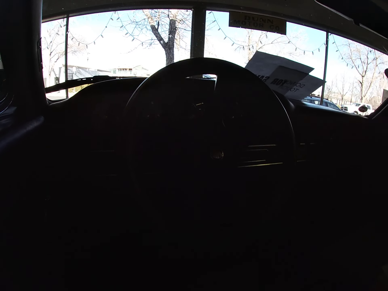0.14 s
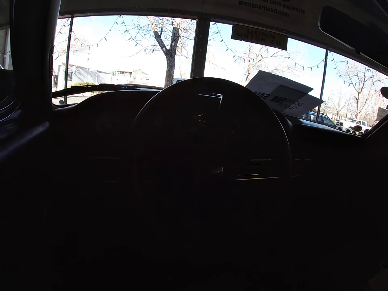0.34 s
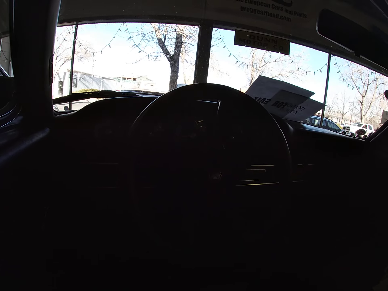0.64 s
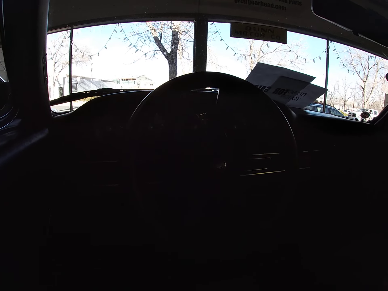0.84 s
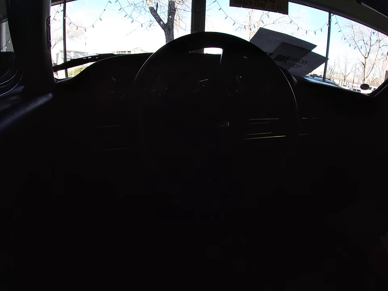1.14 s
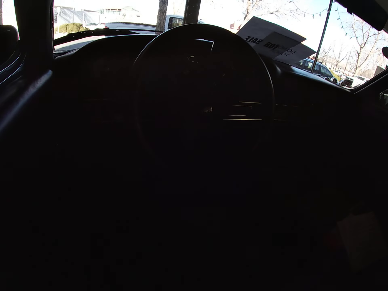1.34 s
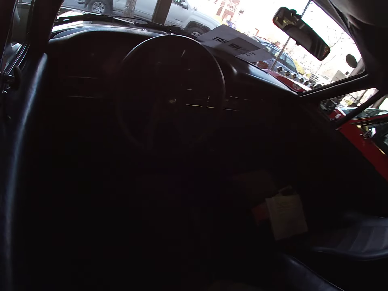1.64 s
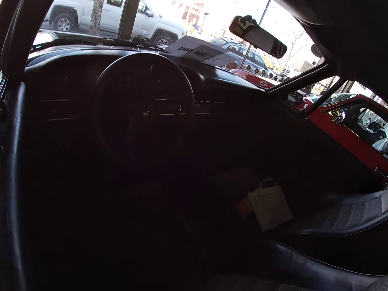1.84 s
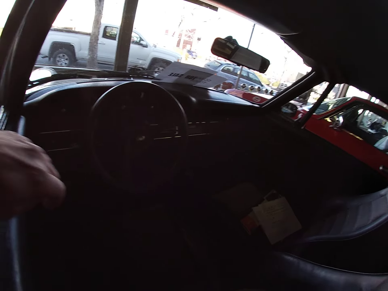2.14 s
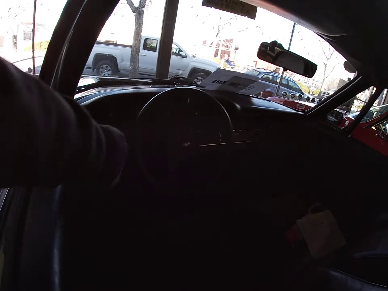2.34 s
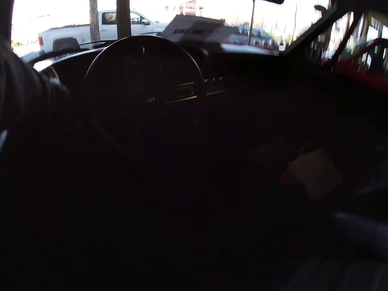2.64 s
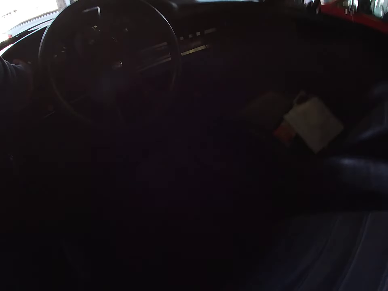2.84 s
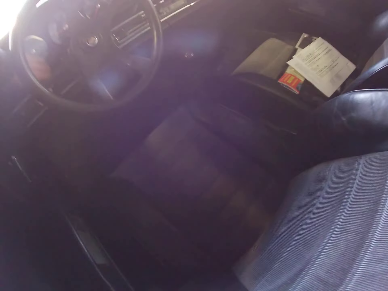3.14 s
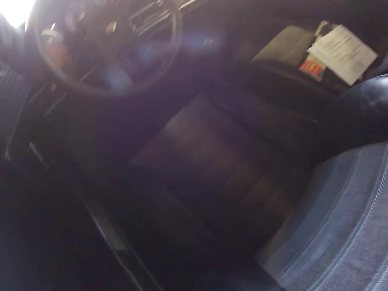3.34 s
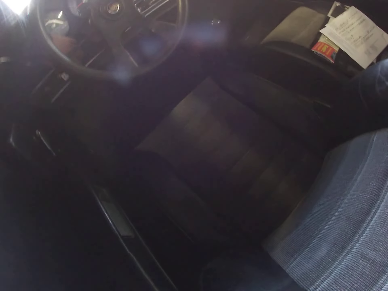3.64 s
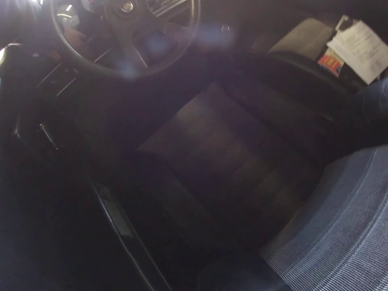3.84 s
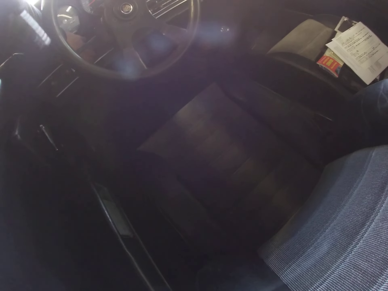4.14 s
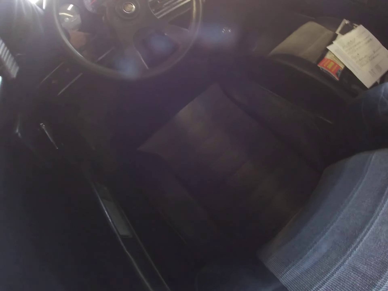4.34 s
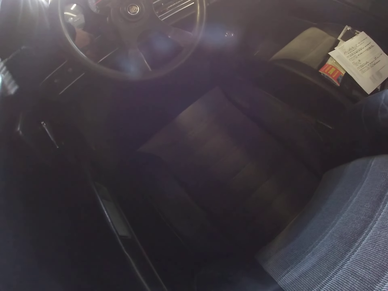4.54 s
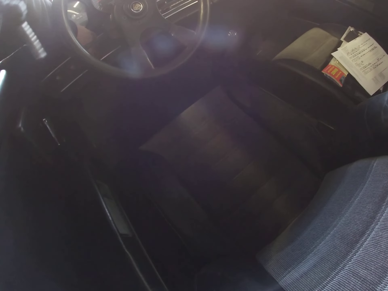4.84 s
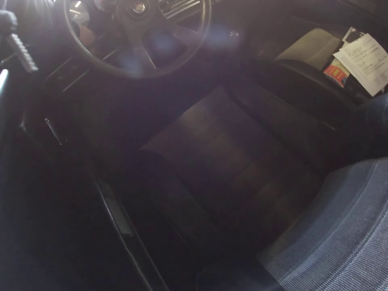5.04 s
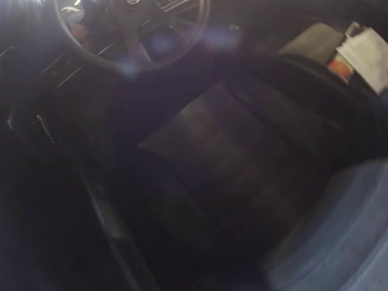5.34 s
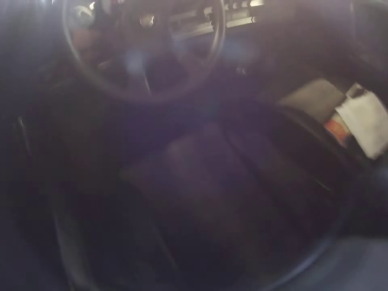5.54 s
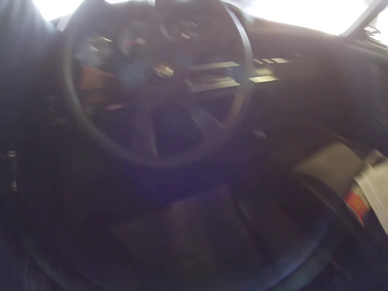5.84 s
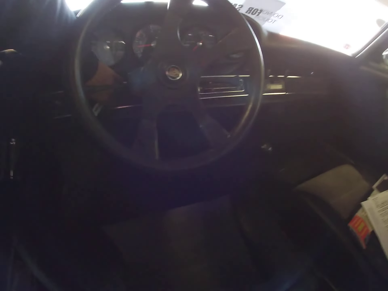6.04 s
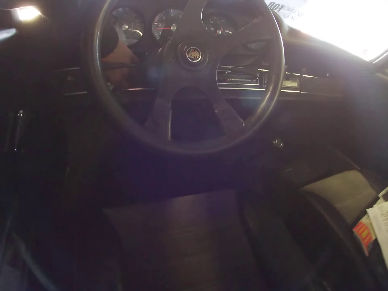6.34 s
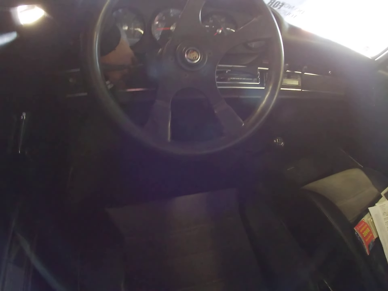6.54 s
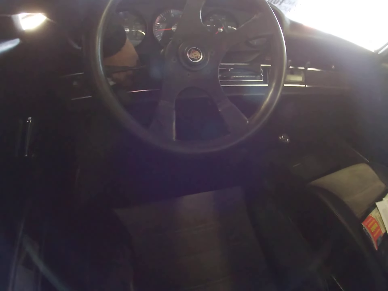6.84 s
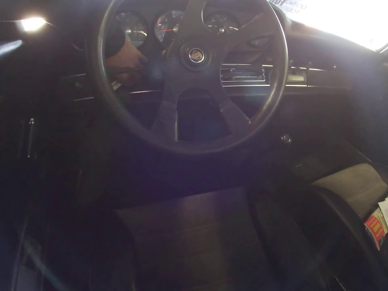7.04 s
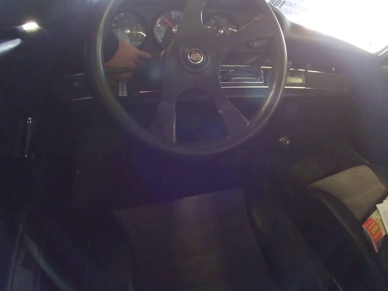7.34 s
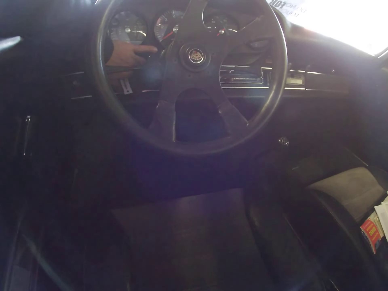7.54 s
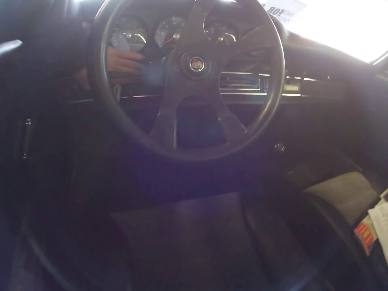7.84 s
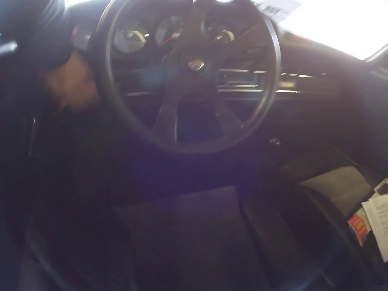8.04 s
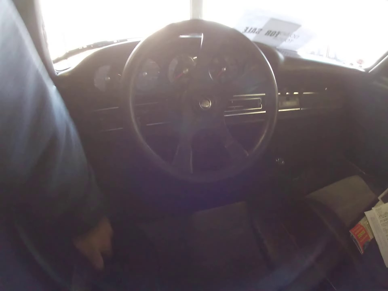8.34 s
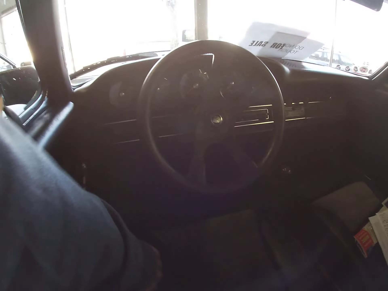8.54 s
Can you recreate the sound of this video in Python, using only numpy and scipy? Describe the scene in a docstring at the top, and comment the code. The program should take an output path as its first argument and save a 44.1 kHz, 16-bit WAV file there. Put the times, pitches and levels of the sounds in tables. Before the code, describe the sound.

A rough, slightly wavering idle fills a car cabin, its deep boom swelling and dipping as the close microphone is moved and jogged. Clatter and whine come forward toward the door and recede again. After about seven seconds a key clacks, the engine loses its bite, lurches down and stops. Then come crisp metal lock clicks, cloth rustle and dull seat knocks, with faint deep street noise.

```python
"""An air-cooled six-cylinder engine idles behind a car cabin, heard from a microphone moving about inside.
Crank-locked lines boom over noise puffs; valve knocks gate noise; gears and fan whine as higher lines.
The key is turned and the engine runs down: compression strokes and shudders ring damped modes of the body.
Keys and lock are noise cracks with short rings, sleeves and seat scrapes are grainy noise swishes,
the driver's seat bumps and the jogged microphone are damped thuds; a quiet street is steady coloured noise."""
import sys
import numpy as np
from scipy import signal
from scipy.fft import rfft, irfft, next_fast_len
from scipy.io import wavfile
from scipy.ndimage import uniform_filter1d

SR = 44100
rng = np.random.default_rng(int(sys.argv[2]) if len(sys.argv) > 2 else 0)


def int16_out(signal):
    """Quantize to a 16-bit WAV file."""
    q = np.round(np.clip(np.atleast_2d(signal).T, -1, 1) * 32767)
    wavfile.write(sys.argv[1], SR, q.astype(np.int16))


N = 383669

# air resonance of the cabin, which the 6th exhaust harmonic can meet
CABIN_HZ, CABIN_WIDTH_HZ = 220.44, 19.6


def undb(db):
    """Decibels to gain."""
    return 10 ** (np.asarray(db) / 20)


def unit(x):
    """Scale to an rms of one."""
    return x / np.sqrt(np.mean(x ** 2))


def curves(rows):
    """Each column of a (t/s, ...) table at every sample."""
    s, *columns = np.transpose(rows)
    t = np.arange(N) / SR
    return [np.interp(t, s, column) for column in columns]


def colour(x, points):
    """Causal minimum-phase filter through (f/Hz, level/dB) points."""
    size = next_fast_len(2 * len(x))
    size += size % 2
    hz, db = np.transpose(points)
    bin_hz = np.arange(size // 2 + 1) * SR / size
    gain_db = np.interp(np.log(bin_hz + 1), np.log(hz), db)
    # folding the cepstrum onto positive time makes the response causal
    cepstrum = irfft(np.log(undb(gain_db)))
    cepstrum[1:size // 2] *= 2
    cepstrum[size // 2 + 1:] = 0
    return irfft(rfft(x, size) * np.exp(rfft(cepstrum)))[:len(x)]


def walk(rate):
    """Smooth random drift with an rms of one, from `rate` fresh values a second."""
    k = int(SR / rate)
    held = np.repeat(rng.standard_normal(N // k + 2), k)[rng.integers(k):][:N]
    return unit(uniform_filter1d(held, k))


def fade(t, t60):
    """Exponential decay, 60 dB down after t60."""
    return np.exp(-np.log(1000) * t / t60)


def add(out, s, sound):
    """Mix a sound in from time s."""
    start = int(s * SR)
    out[start:start + len(sound)] += sound[:N - start]


def resonance(hz, centre_hz, width_hz):
    """Gain of a resonance for a line at hz, one at its centre."""
    return 1 / np.hypot(1, 2 * (hz - centre_hz) / width_hz)


def tone(firings, order, waver_db, slip, rate, late=None):
    """Crank-locked line, uneven in level and phase (slip, radians); it crests `late` radians on, or anywhere."""
    late = 2 * np.pi * rng.random() if late is None else late
    phase = 2 * np.pi * order * firings - late + slip * walk(rate)
    return np.sqrt(2) * undb(waver_db * walk(rate)) * np.cos(phase)


def strikes(events, modes, points, t60, ring_db, settle):
    """Small metal parts: a crack scattered round the cabin and a short ring; each event tilts the treble."""
    ring_scatter = .004
    out, t = np.zeros(N), np.arange(SR // 4) / SR
    for s, db, bright_db in events:
        tilted = [(hz, g + bright_db * np.log2(hz)) for hz, g in points]
        envelope = fade(t, t60) + np.exp(-t / settle) + .05 * fade(t, 0.15)
        crack = colour(rng.standard_normal(len(t)) * envelope, tilted)
        ring = 0
        for hz, g, life in modes:
            cycles = hz * rng.normal(1, ring_scatter) * t + rng.random()
            ring = ring + undb(g + bright_db * np.log2(hz)) * fade(t, life) * np.sin(2 * np.pi * cycles)
        hit = unit(crack) + undb(ring_db) * unit(ring)
        # the event level is that of its first 5 ms
        add(out, s, undb(db) * hit / np.std(hit[:SR // 200]))
    return out


def thuds(events, scuff=.5, attack_s=0.0036):
    """Padded blows: a damped thud with a little scuff."""
    out, t = np.zeros(N), np.arange(SR // 3) / SR
    for s, db, hz, t60 in events:
        dull = [(hz / 3, -20), (hz, 0), (2 * hz, -9), (8 * hz, -40), (30 * hz, -80)]
        noise = unit(colour(rng.standard_normal(len(t)), dull))
        envelope = fade(t, t60) * (1 - np.exp(-t / attack_s))
        add(out, s, undb(db) * (np.sin(2 * np.pi * hz * t) + scuff * noise) * envelope)
    return out


def exhaust(firings, hz, even_db, weak_db, shake_db):
    """Strong even firing harmonics, weaker crank-locked lines, and unequal puffs rumbling through the body."""
    # weaker crank-locked lines of exhaust, belt and gears: multiple of the firing rate, level/dB
    weak_orders = [(.667, -37.5), (.885, -33), (1, -29), (3, -39.5), (5, -41), (7, -52.5), (8, -52.5),
                   (13, -62.5), (15, -54.5)]
    # rumble through the body shell: f/Hz, level/dB
    rumble_colour = [(15, -19), (30, 10), (55, 4), (80, -2.5), (120, 7), (170, -5.5), (250, -13),
                     (350, -23), (500, -20), (900, -76.5)]
    lump_db = .9  # one firing is stronger than the next
    puff_s = 0.02  # decay of one puff; the puffs draw apart as the crank slows
    second, fourth, sixth = (undb(db) for db in even_db)
    # the strong lines crest together at each puff; the cabin resonance holds the sixth back
    cabin_lag = np.pi / 2 + np.arctan(2 * (6 * hz - CABIN_HZ) / CABIN_WIDTH_HZ)
    boom = (second * tone(firings, 2, waver_db=0.64, slip=0.06, rate=20, late=0)
            + fourth * tone(firings, 4, waver_db=1.74, slip=0.17, rate=10, late=0)
            + sixth * tone(firings, 6, waver_db=1.0, slip=0.092, rate=14, late=cabin_lag))
    boom = boom * undb(lump_db * walk(np.median(hz)))
    weak = sum(undb(db) * tone(firings, order, waver_db=3.0, slip=0.73, rate=9)
               for order, db in weak_orders)
    puffs = rng.standard_normal(N) * np.exp(-(firings % 1) / hz / puff_s)
    rumble = undb(-32.5) * unit(colour(puffs, rumble_colour))
    return boom + undb(weak_db) * (weak + crank_lines(firings, hz)) + undb(shake_db) * rumble


def crank_lines(firings, hz, count=52):
    """Unequal cylinders repeat with each turn of the crank, every three firings, giving faint lines."""
    # level of each line by its pitch: f/Hz, level/dB
    line_levels = [(45, -41), (95, -47.5), (150, -56.5), (250, -61.5), (380, -58.5), (470, -69), (540, -63),
                   (700, -69)]
    line_hz, line_db = np.transpose(line_levels)
    orders = [k / 3 for k in range(4, count) if k % 3]
    lines = 0
    for order in orders:
        gain = undb(np.interp(order * np.median(hz), line_hz, line_db))
        lines = lines + gain * tone(firings, order, waver_db=2.5, slip=0.67, rate=5)
    return lines


def valve_train(firings, door_db, scatter_db=3.0, air=1.0):
    """Two valve knocks a firing over the rush of cooling air, both as shaped noise."""
    # valve knock of each cylinder in firing order: level/dB
    cylinders = [-1.5, -9.5, -5, -4, -9, -6.5]
    # clatter through the upholstery: f/Hz, level/dB
    clatter_colour = [(200, -24.5), (300, -7), (400, -7.5), (480, -10.5), (600, -10), (780, -9), (1100, -7),
                      (1450, -10), (2300, -18.5), (4200, -24.5), (5500, -31.5), (8000, -33), (9500, -49),
                      (12000, -75.5)]
    # treble through the open door, with ringing peaks of the engine casing: f/Hz, level/dB
    door_colour = [(750, -17.5), (950, -4.5), (1040, 9), (1200, 2.5), (1340, 10), (1500, 8), (1680, 8),
                   (2300, 5), (3200, 1.5), (5000, -3), (8000, -7), (10000, -25), (14000, -43.5)]
    knock_decay = .3  # in knock intervals
    door_sharpness = 1.1  # the knocks stand out more sharply through the open door
    knock = (2 * firings).astype(int)
    size_db = np.take(cylinders, knock // 2, mode="wrap") + scatter_db * rng.standard_normal(N)[knock]
    knocks = undb(size_db) * np.exp(-(2 * firings % 1) / knock_decay)
    rush = air * undb(0.3 * walk(16))
    grit = np.hypot(knocks, rush)
    muffled = unit(colour(grit * rng.standard_normal(N), clatter_colour))
    # near the open door the treble arrives without passing through the upholstery
    direct = unit(colour(grit ** door_sharpness * rng.standard_normal(N), door_colour))
    return undb(2.0) * muffled + undb(door_db) * direct


def whine(firings, hz, fan_db, hum_db, panel_hz=336, panel_width_hz=26):
    """Rough gear and fan lines; the lowest pair sings out when the idle meets a panel resonance."""
    # timing gears: multiple of the firing rate, level/dB
    gear_orders = [(24.2, -60.5), (28, -53.5), (30.2, -59), (31.7, -57), (37.333, -55), (46.3, -62)]
    # cooling fan and its belt drive: multiple of the firing rate, level/dB
    fan_orders = [(18.667, -50.5), (19.6, -53)]
    # hum of the panel: multiple of the firing rate, level on resonance/dB
    hum_orders = [(9.333, -52), (9.7, -49.5)]
    # the highest gear line comes and goes as the microphone moves: t/s, level/dB
    high_whine = [(0, -58), (.35, -63), (.9, -59.5), (1.3, -57), (1.5, -62), (1.68, -47.5), (1.9, -56),
                  (2.18, -51), (2.6, -57), (3.2, -65), (3.38, -55), (3.7, -59), (3.9, -64), (4.3, -64),
                  (4.5, -58.5), (5.0, -58.5), (5.25, -65), (5.6, -62), (6.3, -64.5), (7.3, -65)]
    gear_slip, fan_slip = .82, .95  # radians: backlash makes teeth meet early or late, smearing the lines
    swell_db = 0.8  # each lower gear line comes and goes on its own
    chatter_db = 1.5  # the teeth rattle, which breaks the whine up
    gears = sum(undb(db + swell_db * walk(5)) * tone(firings, order, waver_db=2.5, slip=gear_slip, rate=30)
                for order, db in gear_orders)
    high_db, = curves(high_whine)
    high = undb(high_db) * tone(firings, 56, waver_db=2.5, slip=gear_slip, rate=24)
    fan = sum(undb(db) * tone(firings, order, waver_db=2.5, slip=fan_slip, rate=28)
              for order, db in fan_orders)
    hum = 0
    for order, db in hum_orders:
        line = undb(db) * tone(firings, order, waver_db=2.5, slip=0.56, rate=16)
        hum = hum + line * resonance(order * hz, panel_hz, panel_width_hz)
    chatter = unit(undb(chatter_db * walk(90)))
    return chatter * gears, chatter * (high + undb(fan_db) * fan) + undb(hum_db) * hum


def engine():
    """The crank speed sets every line's pitch; the layers sink as the engine runs down after the key turns."""
    # the idle hunts slowly up and down: t/s, firing rate f/Hz
    idle = [(0.0, 35.56), (0.13, 35.8), (0.24, 35.3), (0.54, 34.54), (0.78, 35.37), (0.92, 36.05),
            (1.31, 36.21), (1.48, 34.97), (1.55, 34.89), (1.96, 35.47), (2.12, 36.8), (2.3, 37.01),
            (2.38, 36.65), (2.53, 35.24), (2.73, 34.34), (2.94, 34.97), (3.08, 36.35), (3.15, 36.76),
            (3.43, 36.11), (3.66, 35.94), (3.85, 34.78), (4.12, 35.31), (4.3, 36.53), (4.75, 36.19),
            (4.88, 35.76), (5.47, 36.77), (5.92, 35.94), (6.28, 37.07), (6.43, 36.4), (6.57, 35.16),
            (6.71, 35.15), (7.06, 36.74), (7.2, 38.14), (7.27, 37.91)]
    # boom at twice the firing rate, as the microphone moves and the engine runs down: t/s, level/dB
    second_level = [(0.0, -22.5), (0.12, -38), (0.3, -22), (0.45, -16.5), (0.72, -22.5), (0.92, -34),
                    (1.02, -23.5), (1.32, -20), (1.5, -28.5), (1.68, -23.5), (1.87, -20.5), (1.93, -22),
                    (2.0, -18.5), (2.55, -19.5), (2.68, -27.5), (2.97, -30.5), (3.11, -21.5), (3.35, -27),
                    (3.85, -23.5), (4.35, -22), (4.8, -24.5), (5.3, -22), (5.7, -28), (5.98, -33),
                    (6.24, -19), (6.46, -33.5), (6.73, -17.5), (6.86, -22), (6.95, -32.5), (7.07, -20),
                    (7.28, -24.5), (7.42, -22.5), (7.56, -22.5), (7.66, -27), (7.75, -24.5), (7.87, -25.5),
                    (7.96, -28.5), (8.09, -24), (8.19, -33)]
    # line at four times the firing rate: t/s, level/dB
    fourth_level = [(0, -35.5), (.45, -26.5), (.7, -32.5), (1.25, -26.5), (1.45, -33), (1.85, -30.5),
                    (1.99, -37), (2.08, -29.5), (2.22, -28), (2.48, -32.5), (2.6, -33.5), (2.7, -31),
                    (2.95, -35.5), (3.1, -29.5), (3.9, -32.5), (4.6, -29.5), (5.6, -30), (6.3, -31),
                    (7.25, -31.5), (7.45, -39), (7.9, -39), (8.05, -50)]
    # microphone leaning toward the open door and back inside:
    # t/s, clatter level/dB, treble through the door relative to it level/dB
    position = [(0, -45.5, -7), (.42, -43, -7.5), (.85, -46.5, -4), (1.5, -42.5, -3), (2.08, -38, -2),
                (2.34, -39.5, -3), (2.6, -41.5, -0.5), (3.1, -45.5, -7.5), (3.6, -45, -11),
                (5.6, -45, -9.5), (6.4, -45.5, -30), (7.3, -46, -30)]
    # the lower whines where the microphone is: t/s, fan level/dB, panel hum level/dB
    whine_level = [(0, -4, 2.5), (.16, 5, 4), (.28, -2, 6.5), (.45, 3, 1.5), (.85, 3, 3.5), (1.27, 2.5, -8),
                   (1.42, -1, 7.5), (1.95, 3.5, 7), (2.2, -4, -2), (2.46, 5.5, 3.5), (2.7, 2.5, 5.5),
                   (3.55, 1, -5.5), (3.9, -3, 1.5), (4.7, 0.5, -3), (5.6, 1, -3), (6.5, -7, 0.5),
                   (7.05, -3.5, -1), (7.22, -2.5, 9), (7.4, -1, -2)]
    # the bite of the firings fades before the crank has begun to slow
    key_turn_s, sixth_fade_db_per_s, weak_fade_db_per_s = 7, 25, 19
    # the speed decays (time constant coast_s) to a last slow rocking
    coast_from_s, coast_s, rocking_hz = 7.28, .66, 11.5
    # the crank stops: its clatter is cut short and the car's rocking dies away
    stall_s, rocking_fade_db_per_s, clatter_fade_db_per_s = 8.03, 40, 190
    shake_slope, clatter_slope, whine_slope = 1.04, 1.53, 3  # dB lost for each dB of speed lost
    # share of the clatter's rise near the door that the gears and the 6th harmonic follow
    gear_near_share, sixth_near_share = 1.32, 0.41
    gear_db_per_hz = 1  # the gears load up and sing as the idle climbs

    t = np.arange(N) / SR
    idle_hz, = curves(idle)
    second_db, = curves(second_level)
    fourth_db, = curves(fourth_level)
    clatter_db, door_db = curves(position)
    near_db = clatter_db - np.median(clatter_db)
    off_s, coasting_s, stalled_s = (np.maximum(t - s, 0) for s in (key_turn_s, coast_from_s, stall_s))
    hz = np.maximum(idle_hz * np.exp(-coasting_s / coast_s), rocking_hz)
    speed_db = 20 * np.log10(hz / idle_hz)
    stop_db = -clatter_fade_db_per_s * stalled_s
    # with the ignition off, compression checks the crank and the strokes come strong and weak:
    # t/s, spread of speed (fraction), strong-weak swing (fraction)
    stumble, lurch = curves([(7.27, .006, 0), (7.36, .09, .5), (7.85, .11, .5), (8, .06, 0)])
    firings = np.cumsum(hz * (1 + stumble * walk(25))) / SR

    cabin_db = 20 * np.log10(resonance(6 * idle_hz, CABIN_HZ, CABIN_WIDTH_HZ) ** 2)
    # the 6th harmonic sings when it meets the cabin resonance
    sixth_db = -34 + cabin_db + sixth_near_share * near_db - sixth_fade_db_per_s * off_s
    weak_db = -weak_fade_db_per_s * off_s
    shake_db = -3 + shake_slope * speed_db + stop_db
    boom = exhaust(firings, hz, (second_db, fourth_db, sixth_db), weak_db, shake_db)
    strokes_gain = (1 - fade(coasting_s, coast_s)) * undb(speed_db + stop_db)
    boom = boom + strokes_gain * compression_strokes(firings)
    boom = boom * (1 + lurch * np.cos(np.pi * firings)) * undb(-rocking_fade_db_per_s * stalled_s)

    clatter = undb(clatter_db + clatter_slope * speed_db) * valve_train(firings, door_db)
    gears, other_lines = whine(firings, hz, *curves(whine_level))
    gear_db = gear_near_share * near_db + gear_db_per_hz * (idle_hz - np.median(idle_hz))
    lines = (undb(gear_db) * gears + other_lines) * undb(whine_slope * speed_db)
    return boom + (clatter + lines) * undb(stop_db)


def street():
    """Quiet street: steady noise, mostly deep."""
    # the street from inside the cabin: f/Hz, level/dB
    street_colour = [(12, -29), (20, 2), (33, 0.5), (80, -25.5), (170, -23.5), (261, -41.5), (659, -55),
                     (831, -50), (2850, -55.5), (6830, -54.5), (9300, -64.5), (12100, -91), (20500, -120)]
    return undb(-36.5) * unit(colour(rng.standard_normal(N), street_colour))


def handling():
    """The hand jogs the microphone: soft, low damped thuds."""
    # jogs of the hand: t/s, level/dB, f/Hz, t60/s
    jogs = [(1.915, -14.5, 96, 0.15), (2.59, -10.5, 29.92, 0.29)]
    return thuds(jogs, scuff=0.4)


def keys():
    """Keys knock on their ring: small metal cracks with high ringing modes."""
    # knocks: t/s, level/dB, brightness/(dB per octave)
    key_knocks = [(2.614, -48, 8), (2.667, -53, 8), (2.853, -53, 9), (3.305, -59, 7), (3.490, -55, 10),
                  (6.942, -53, 2), (6.975, -48, 9), (7.065, -30, 0), (7.250, -48, -1), (7.287, -50, -2),
                  (7.375, -53, 2), (7.573, -47.5, 1.5), (7.662, -57, 4), (7.811, -49.5, 1), (8.344, -57, 6)]
    # ringing of the keys: f/Hz, level/dB, t60/s
    key_modes = [(1100, -12, 0.07), (4070, -5.5, 0.077), (5340, -8, 0.1), (5430, -11, 0.069),
                 (5810, 0.5, 0.068), (6080, -5, 0.069), (6815, -3.5, 0.06), (7900, -3, .05)]
    # crack of the keys: f/Hz, level/dB
    key_colour = [(500, 3), (1100, 10.5), (2000, -9), (3100, -2.5), (4700, -2.5), (5400, 0.5), (6400, -1),
                  (8200, -2), (9200, -19), (11500, -28), (14000, -35)]
    return strikes(key_knocks, key_modes, key_colour, t60=0.077, ring_db=-2.5, settle=0.0019)


def cloth():
    """Grainy swishes of fabric; hard rubbing adds a mid-range scrape."""
    # sleeves and trousers: t/s, half length/s, level/dB
    rustles = [(3.29, 0.035, -67), (3.567, 0.058, -50.5), (5.38, 0.082, -58), (5.62, 0.087, -50.5),
               (7.955, 0.027, -54), (8.47, 0.13, -64.5), (8.64, 0.028, -60.5)]
    # fabric: f/Hz, level/dB
    cloth_colour = [(300, -24), (1500, 7.5), (3500, 6), (8000, 0.5), (10000, -14), (14000, -37)]
    # a leg scraping over the seat: t/s, half length/s, level/dB
    scrapes = [(8.165, 0.026, -50), (8.368, 0.014, -53), (8.422, .022, -52), (8.515, 0.018, -54)]
    # scrape: f/Hz, level/dB
    scrape_colour = [(200, 5), (600, -6), (900, -5), (1400, -7), (2500, -19), (8000, -19), (12000, -61.5)]
    t, out = np.arange(N) / SR, 0
    for events, points in (rustles, cloth_colour), (scrapes, scrape_colour):
        motion = sum(undb(db) * np.exp(-((t - s) / half) ** 2) for s, half, db in events)
        grain = rng.standard_normal(N) * undb(2.4 * walk(250))
        out = out + motion * unit(colour(grain, points))
    return out


def compression_strokes(firings, scatter_db=3.0):
    """With no spark left, each piston still bumps against its air and rings the car body."""
    # body of the car: f/Hz, level/dB, t60/s
    body_modes = [(64.6, -23, 0.15), (88.3, -22, 0.12), (139, -29, 0.15), (215, -47, 0.065),
                  (340, -48, 0.052)]
    t = np.arange(SR // 4) / SR
    stroke_gain = undb(scatter_db * rng.standard_normal(N)[firings.astype(int)])
    bumps = np.diff(np.floor(firings), prepend=0) * stroke_gain
    ring = sum(undb(db) * np.sin(2 * np.pi * hz * t) * fade(t, t60) for hz, db, t60 in body_modes)
    soft_ring = ring * (1 - fade(t, 0.022))
    return signal.fftconvolve(bumps, soft_ring)[:N]


def shudders():
    """The stopping engine kicks in its mounts and shakes the body: low damped thuds."""
    # kicks: t/s, level/dB, f/Hz, t60/s
    kicks = [(7.305, -19, 109, 0.25), (7.405, -21, 58, 0.2), (7.455, -29, 118, .12), (7.535, -16, 85, 0.33),
             (7.66, -29.5, 125, 0.18), (7.735, -15, 38.3, .3), (7.85, -15, 24.06, .3)]
    return thuds(kicks, scuff=0.11)


def lock():
    """The ignition lock clicks as the key slides out: metal cracks with lower ringing modes."""
    # clicks: t/s, level/dB, brightness/(dB per octave)
    lock_clicks = [(7.835, -53, -2), (7.909, -42, 1), (7.917, -48, -2), (7.940, -51, -3), (7.952, -54, -6),
                   (7.999, -50, 4), (8.028, -54, 4), (8.067, -55, 1), (8.078, -33.5, 0),
                   (8.084, -36.5, -1.5), (8.140, -42, -2.5), (8.148, -54, -4), (8.163, -56, -4),
                   (8.353, -49, -4.5)]
    # ringing of the lock: f/Hz, level/dB, t60/s
    lock_modes = [(570, 3.5, 0.12), (837, -3, .12), (1070, -1, 0.07), (1240, 2, 0.057), (1417, 9, 0.059),
                  (1787, 0, 0.06), (2720, -1, 0.04), (4317, -4, .06), (4990, 1, .05), (6290, -6, .055),
                  (6640, -3, .058)]
    # crack of the lock: f/Hz, level/dB
    click_colour = [(200, -13), (440, -6), (570, 8), (740, -2), (1000, -4), (1400, 10), (1600, -2.5),
                    (2700, 0.5), (3600, -9), (5200, -4), (8000, -8.5), (9500, -33), (14000, -52)]
    return strikes(lock_clicks, lock_modes, click_colour, t60=0.056, ring_db=-2, settle=0.00084)


def seat():
    """The driver bumps the seat: every bump sounds the same damped modes."""
    # bumps: t/s, level/dB
    seat_bumps = [(8.353, -39), (8.43, -33.5), (8.488, -27.5)]
    # seat: f/Hz, level relative to the bump/dB, t60/s
    seat_modes = [(114.5, 1.5, 0.19), (154.5, -1, 0.14), (344, -10, 0.066), (436, -14.5, 0.061),
                  (660, -11.5, 0.05), (1300, -23, 0.032)]
    events = [(s, db + mode_db, hz, t60) for s, db in seat_bumps for hz, mode_db, t60 in seat_modes]
    # the seat frame is hit hard, the mounts and the microphone softly
    return thuds(events, scuff=0.23, attack_s=.001)


def scene():
    """Engine, keys and driver over a quiet street."""
    car = engine() + shudders()
    driver = keys() + lock() + seat() + cloth()
    return (car + driver + handling() + street())[None]


def record(dry):
    """The microphone loses the deepest bass and cuts the top."""
    bass_cut = signal.butter(2, 12, "high", fs=SR, output="sos")
    top_cut = signal.ellip(8, .2, 70, 14300, fs=SR, output="sos")
    thinned = signal.sosfilt(bass_cut, dry)
    return signal.sosfilt(top_cut, thinned)


dry = scene()
out = record(dry)
int16_out(out)
```